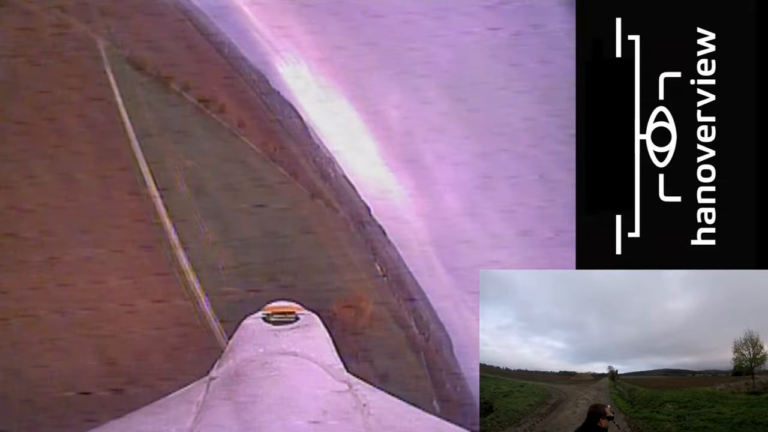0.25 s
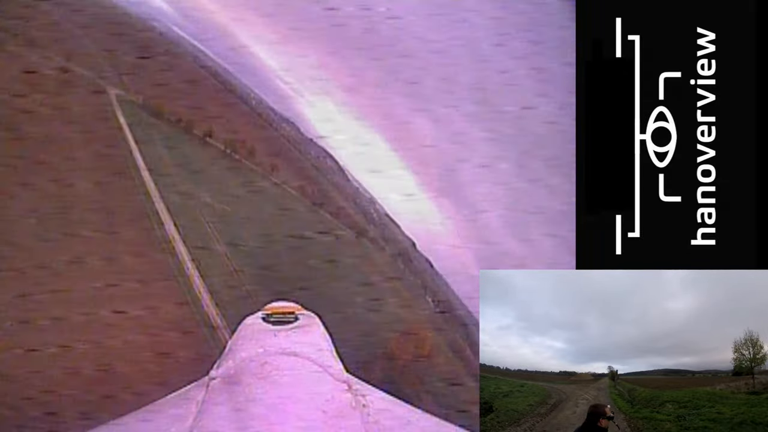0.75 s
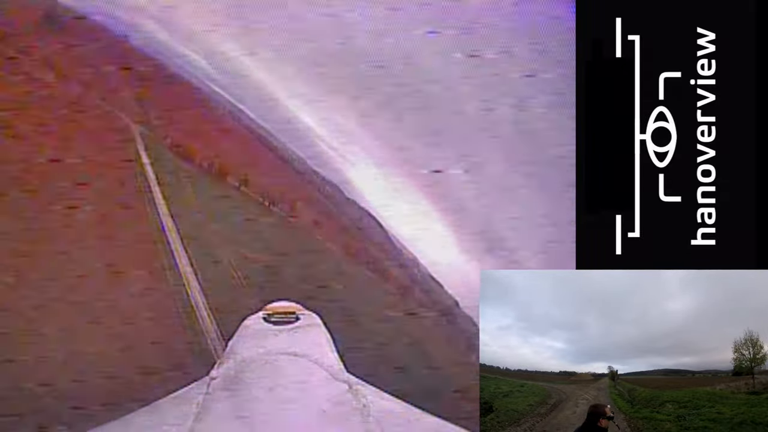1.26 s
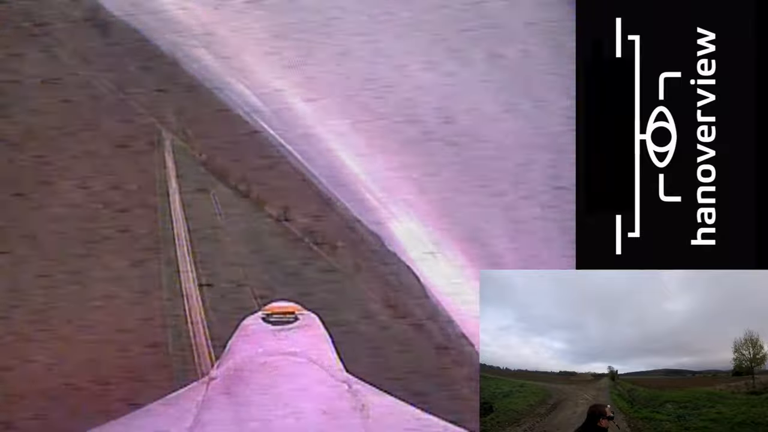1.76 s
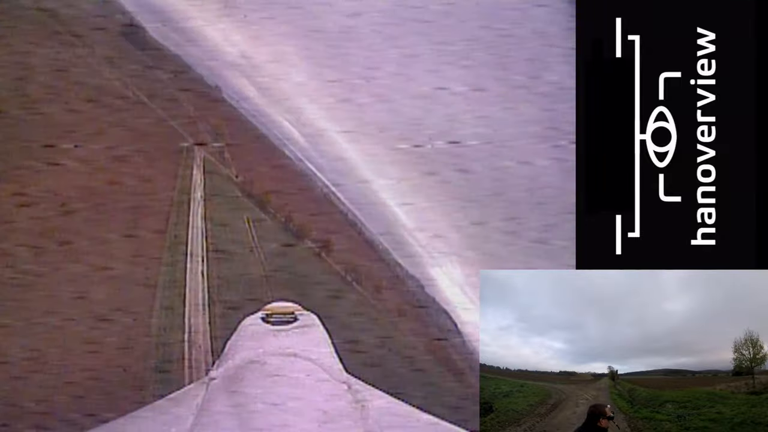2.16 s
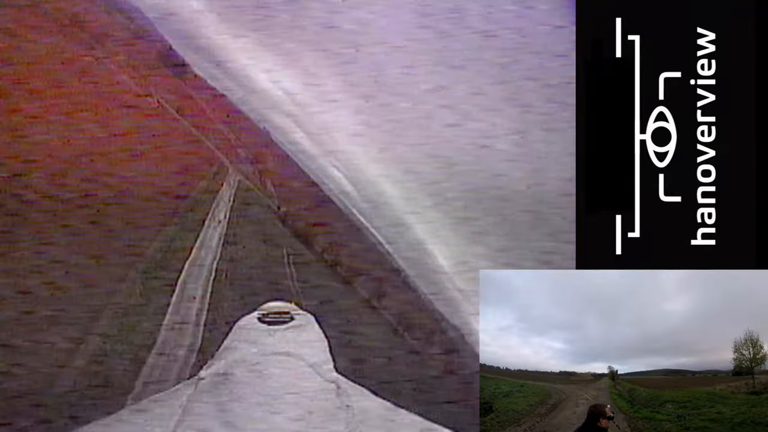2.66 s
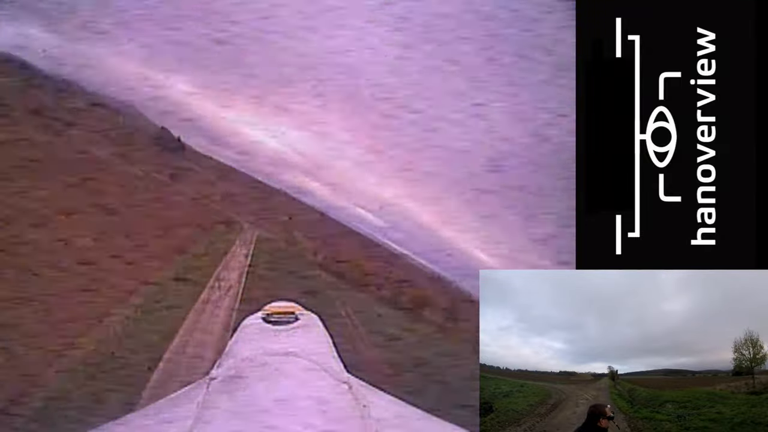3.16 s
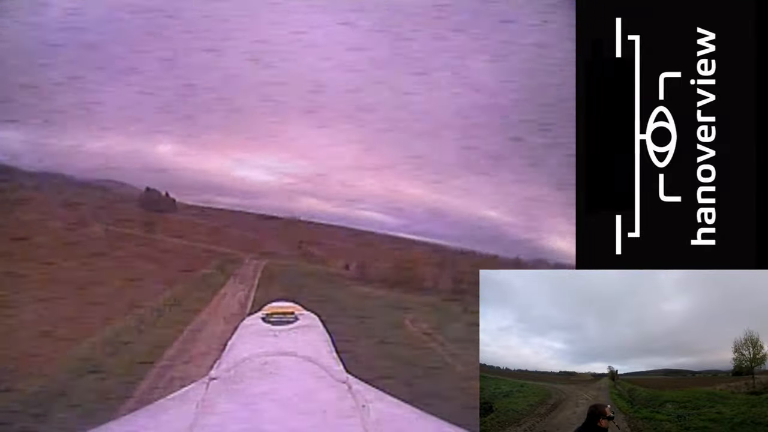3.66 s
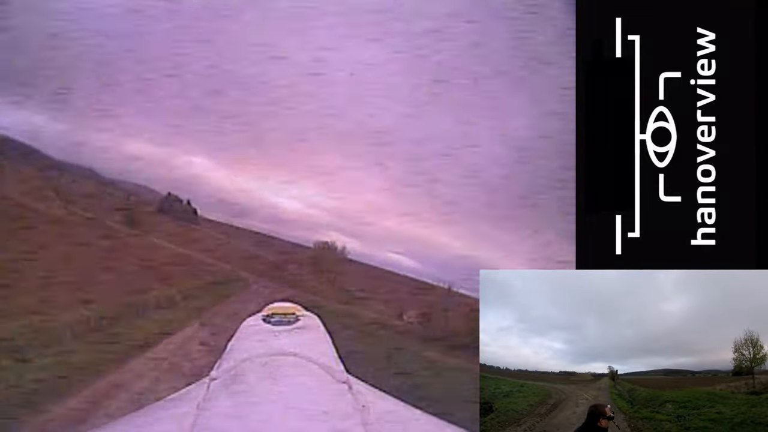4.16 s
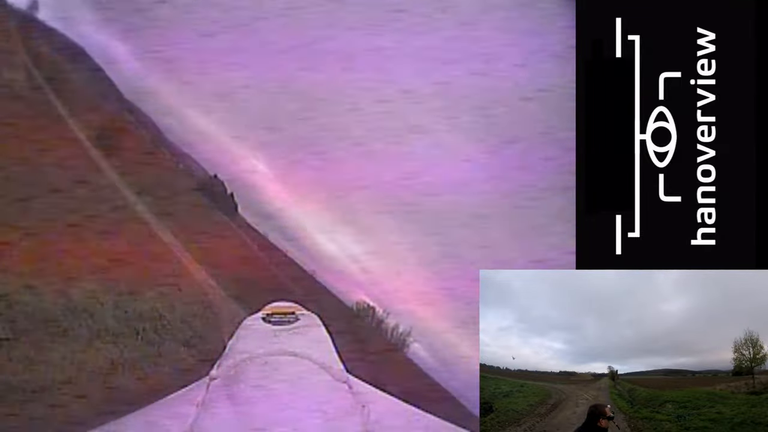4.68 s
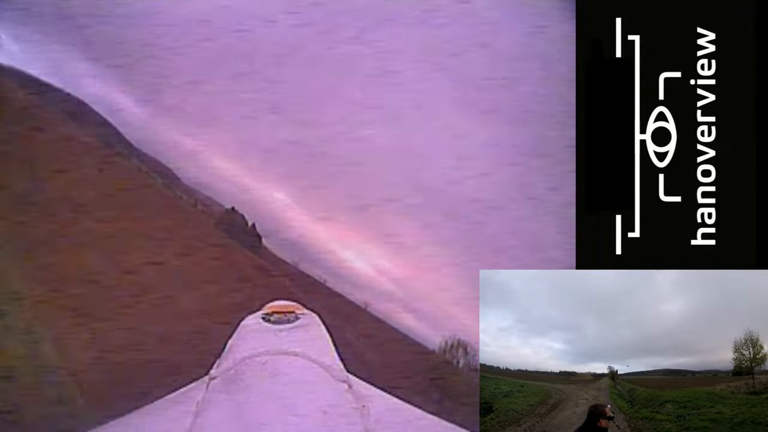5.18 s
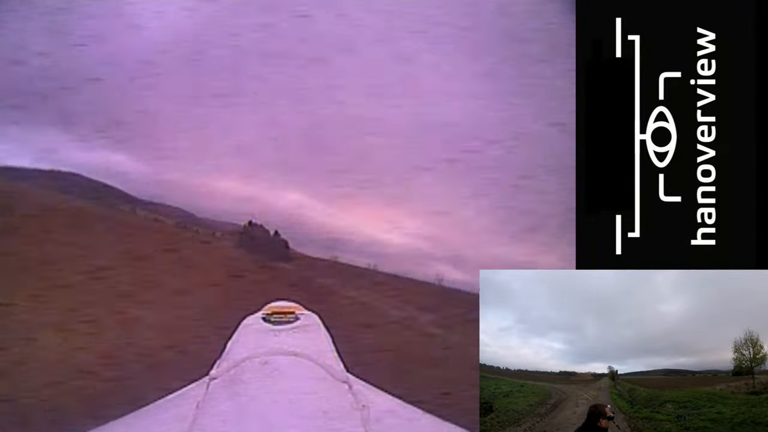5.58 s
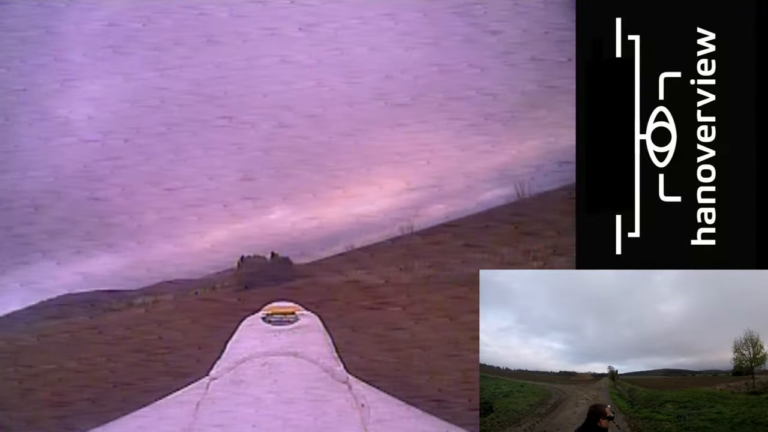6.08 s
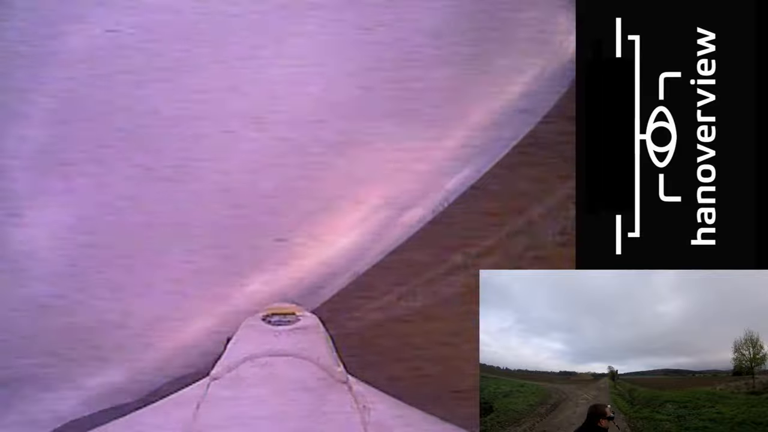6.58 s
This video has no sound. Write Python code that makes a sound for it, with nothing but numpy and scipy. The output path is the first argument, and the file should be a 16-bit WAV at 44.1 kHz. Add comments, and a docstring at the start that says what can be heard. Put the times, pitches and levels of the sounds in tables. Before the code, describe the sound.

A faint two-toned propeller whine rises under heavy wind buffeting, grows loud and hissing on a close pass, then falls in pitch as it throttles back.

```python
"""In an open field a model aircraft with two electric rotors speeds up, passes a microphone and throttles back.
Rotors: sums of sine partials at multiples of the shaft rates, which swell and fade, each on its own.
Slipstream: two bands of noise that surge and flicker. Wind: lumps of low noise and short pops on the bare capsule.
A brief throbbing rattle of narrow noise comes early; a faint steady noise of the field lies under everything."""
import sys
import numpy as np
from scipy import signal
from scipy.fft import rfft, irfft, next_fast_len
from scipy.io import wavfile

SR = 44100
rng = np.random.default_rng(int(sys.argv[2]) if len(sys.argv) > 2 else 0)


def dump(signal):
    """Clip the signal to [-1, 1] and save it as 16-bit WAV at the path in sys.argv[1]."""
    limited = np.clip(np.atleast_2d(signal).T, -1, 1)
    pcm = np.round(limited * 32767).astype(np.int16)
    wavfile.write(sys.argv[1], SR, pcm)


N = 301203  # samples

# Levels of the sounds hold ahead of the microphone; its own hiss is added after the roll-off.
# A decay is the time from a peak to 1/e of it.
# Rotors. Blade tones as heard: [t/s, faster rotor f/Hz, slower rotor f/Hz]
BLADE_TONES = [(0.0, 600, 560), (0.125, 652, 622), (0.25, 765, 690), (0.375, 862, 755), (0.5, 912, 815),
               (0.625, 960, 858), (0.75, 990, 887), (0.875, 1039, 936), (1.0, 1074, 958),
               (1.25, 1139, 1025), (1.5, 1198, 1072), (1.75, 1243.5, 1111), (2.0, 1342, 1178.5),
               (2.125, 1389.5, 1202.5), (2.25, 1431, 1223), (2.375, 1457, 1244), (2.625, 1500, 1285),
               (2.875, 1565.5, 1332), (3.0, 1605, 1360.5), (3.125, 1659, 1408), (3.25, 1680, 1440),
               (3.375, 1694.5, 1448), (3.5, 1735.5, 1475), (3.625, 1800.5, 1515), (3.75, 1836.5, 1529.5),
               (3.875, 1828, 1527), (4.06, 1829, 1534), (4.375, 1788.5, 1520), (4.625, 1742, 1493),
               (4.75, 1698.5, 1457.5), (5.0, 1581, 1369), (5.25, 1480.5, 1290), (5.375, 1450, 1263),
               (5.5, 1430, 1247.5), (5.625, 1413.5, 1239), (5.875, 1390, 1212), (6.125, 1375, 1204),
               (6.25, 1331, 1178), (6.375, 1278, 1137), (6.625, 1101, 1005), (6.75, 1034, 946),
               (6.83, 1009, 925.5)]
# Mean level of the blade tones: [t/s, faster rotor level/dB, slower rotor level/dB]
BLADE_LEVELS = [(0.0, -67, -72), (.25, -54.5, -61), (.375, -49.5, -67), (.5, -51.5, -56), (.7, -48.5, -76),
                (.875, -53, -56), (1.0, -51, -57.5), (1.15, -65, -62), (1.35, -72, -61), (1.5, -54, -57),
                (1.65, -70, -56), (1.87, -58, -62), (1.999, -69, -54.5), (2.13, -51.5, -53),
                (2.27, -48, -49), (2.5, -51.5, -48.5), (2.75, -43.5, -46.5), (2.88, -46, -52),
                (3.12, -39.5, -52.5), (3.4, -42.5, -51.5), (3.63, -37.5, -46), (3.75, -41.5, -52),
                (3.88, -35, -53), (4.0, -28.5, -52.5), (4.25, -39.5, -50), (4.38, -33, -40.5),
                (4.5, -36, -35.5), (4.63, -49, -40), (4.75, -30.5, -45), (5.0, -31, -44.5),
                (5.13, -34, -31.5), (5.3, -42, -33.5), (5.5, -35.5, -38), (5.63, -47, -36),
                (5.77, -38, -33.5), (5.88, -36, -42.5), (6.0, -42, -41.5), (6.1, -39, -46),
                (6.25, -51, -58), (6.37, -50, -52), (6.5, -49, -47.5), (6.83, -55, -49.5)]
# Reference level of the overtones before surges: [t/s, faster rotor level/dB, slower rotor level/dB]
OVERTONE_LEVELS = [(0.0, -73, -77), (.3, -65.5, -66), (0.701, -67, -70), (1.1, -68, -71),
                   (1.5, -63.5, -63.5), (1.8, -69, -61.5), (2.3, -61.5, -58), (2.65, -56.5, -53.5),
                   (2.9, -63.5, -60), (3.2, -52, -59.5), (3.6, -59.5, -52), (3.95, -55, -51),
                   (4.25, -47.5, -49), (4.55, -50.5, -44.5), (4.9, -36.5, -45), (5.2, -44.5, -41.5),
                   (5.5, -41, -39.5), (5.9, -44, -41.5), (6.3, -45.5, -48.5), (6.83, -54, -49.5)]
# Overtones, rotor and shaft order: [level/dB relative to the reference at its loudest, dB lost per dB it falls]
OVERTONES = {"fast 6": (-3, 0.88), "fast 9": (-1.8, 1.11), "fast 12": (-1, 1.24), "fast 15": (-4, 1.42),
             "fast 18": (-11.5, 1.4), "fast 21": (-15, 1.6), "fast 24": (-19, 1.3), "slow 6": (-1.5, 0.97),
             "slow 9": (-3, 1.07), "slow 12": (-6.5, 1.21), "slow 15": (-8, 1.32), "slow 18": (-11.5, 1.35),
             "slow 21": (-12.5, 1.6), "slow 24": (-16.5, 1.3)}
# Motor whine, same key and columns: [relative level/dB, dB lost per dB]
WHINE = {"fast 4": (-24.5, 0.57), "fast 7": (-18.5, 0.73), "fast 14": (-15.5, 1.8), "slow 7": (-12.5, 0.75),
         "slow 14": (-19, 0.78)}
# Momentary added swells of a partial: [t/s, rotor and order, level/dB, decay/s]
SWELLS = [(.25, "fast 6", -68, 0.078), (.5, "slow 6", -64, 0.074), (.75, "fast 6", -63, .08),
          (.75, "slow 9", -75, 0.081), (1.55, "slow 14", -71, .12), (2.1, "fast 4", -64.5, .25),
          (2.12, "fast 21", -58, 0.12), (3.2, "fast 4", -65, 0.52), (3.4, "slow 9", -60.5, 0.062),
          (4.25, "slow 21", -52, .2), (4.62, "slow 21", -45, 0.07), (4.5, "fast 21", -46, .15),
          (4.9, "slow 18", -54, 0.16), (4.88, "fast 15", -61, 0.094), (5.38, "fast 15", -53, .08),
          (5.38, "slow 15", -50, 0.053), (5.75, "slow 15", -58, 0.053), (0.845, "slow 7", -63, 0.14),
          (1.5, "slow 7", -67, 0.36), (1.45, "fast 9", -73, 0.085), (2.295, "slow 6", -59, 0.071),
          (2.496, "slow 12", -62, 0.38), (3.193, "fast 6", -64, 0.3), (3.118, "fast 12", -56, 0.069),
          (3.25, "fast 18", -51, 0.13), (3.3, "slow 21", -46, .1), (2.65, "slow 6", -64, 0.12),
          (2.65, "fast 9", -65, 0.18), (3.247, "fast 9", -62.5, 0.3), (3.63, "fast 9", -59, 0.063),
          (3.65, "slow 6", -59, .1), (3.967, "fast 9", -55.5, 0.24), (3.96, "fast 6", -56, 0.12),
          (4.19, "slow 6", -52, .15), (4.297, "fast 18", -44, .12), (4.597, "fast 18", -43, 0.1),
          (4.622, "fast 6", -40.5, 0.13), (4.56, "slow 6", -50, 0.12), (4.46, "fast 9", -44.5, 0.059),
          (4.8, "fast 9", -43, 0.04), (4.88, "fast 12", -48.5, 0.22), (4.9, "slow 14", -41.5, 0.17),
          (5.075, "fast 14", -49, 0.2), (5.0, "slow 21", -36, 0.11), (5.178, "fast 21", -24, 0.11),
          (5.282, "fast 6", -33.5, 0.15), (5.22, "slow 6", -46, 0.19), (5.388, "slow 12", -43.5, 0.046),
          (5.33, "fast 4", -51, 0.13), (5.51, "slow 6", -47, 0.063), (5.527, "slow 9", -51, 0.091),
          (5.524, "slow 7", -43.5, 0.071), (5.71, "fast 15", -45.5, 0.15), (5.753, "fast 21", -32, 0.23),
          (5.74, "slow 6", -60, 0.099), (6.09, "slow 6", -54, 0.097), (6.242, "slow 9", -48, 0.082),
          (6.276, "fast 12", -58, 0.043), (6.26, "fast 6", -45.5, 0.03), (6.536, "slow 9", -50, 0.11),
          (6.507, "slow 6", -51, .08)]
# Momentary sinking of a partial: [t/s, rotor and order, depth/dB, decay/s]
DROPOUTS = [(.7, "slow 6", 14, .2), (1.15, "fast 12", 12, .15), (1.15, "fast 9", 14, 0.09),
            (1.8, "fast 12", 16, .12), (1.8, "fast 15", 12, .15), (2.0, "slow 15", 16, 0.26),
            (2.2, "fast 6", 8, 0.36), (2.25, "slow 7", 8, .25), (2.882, "fast 12", 20, 0.1),
            (2.88, "slow 9", 14, .1), (2.88, "slow 12", 18, .08), (3.2, "slow 9", 10, .15),
            (3.65, "fast 15", 20, 0.17), (3.75, "slow 7", 12, .25), (4.152, "fast 6", 10, 0.14),
            (4.15, "fast 12", 6, 0.37), (4.8, "slow 6", 6, 0.092), (4.882, "slow 9", 15, .08),
            (5.158, "fast 9", 12, 0.22), (5.42, "fast 21", 14, .1), (5.45, "fast 18", 18, .12),
            (5.55, "fast 6", 12, .08), (5.57, "slow 15", 18, .1), (5.78, "fast 6", 12, 0.1),
            (5.9, "slow 15", 12, .06)]
# Faint tones at the closest approach: [t/s, fast shaft reference level/dB, tone under slow rotor level/dB]
CLOSE_TONES = [(3.4, -75, -80), (3.8, -65, -86), (4.25, -55.5, -82), (4.4, -53, -56), (4.75, -46, -50),
               (5.0, -43.5, -44), (5.2, -51, -47.5), (5.4, -66, -50.5), (5.6, -67, -66)]
# Shaft tones of the fast rotor: [multiple of the shaft rate, level/dB relative to the reference]
SHAFT_ORDERS = [(1, -2.5), (2, -10), (5, -15.5)]
BLADES = 3
UNDERTONE_RATIO = .872  # to the slow blade tone
FADE_DB, FADE_HZ = 4.5, 3.4  # rms depth and corner rate of each partial's own random fading
SURGE_SHARE = 0.59  # how far the partials follow the surges of the hiss body

# Slipstream hiss between its surges: [t/s, body level/dB, treble level/dB]
SLIPSTREAM = [(0.0, -82, -82), (.3, -73, -79), (.8, -70, -77), (1.15, -77, -81), (1.7, -65, -75),
              (2.15, -63, -71), (2.4, -56, -66), (3.0, -56, -66), (3.3, -54, -59), (3.85, -54, -64),
              (4.17, -54, -58), (4.45, -43.5, -47), (4.8, -39.5, -43), (5.25, -40.5, -40), (5.6, -42, -42),
              (5.85, -46, -51), (6.2, -49, -50), (6.45, -53, -56), (6.83, -54, -61)]
# Surges of the hiss: [t/s, body lift/dB, treble lift/dB, decay/s]
SURGES = [(.4, 2, 6, .06), (.67, 1, 5, 0.046), (.96, 9, 9, 0.12), (1.43, 10.5, 13, 0.084),
          (1.58, 7, 9, .05), (1.85, 1, 1.5, 0.066), (2.08, 5, -5, 0.046), (2.25, 2, 0, .04),
          (2.67, 2, 9.5, 0.069), (3.15, 2, 7.5, 0.088), (3.42, -0.5, 6.5, 0.055), (3.67, 4, 3, .06),
          (3.93, 8, 6, 0.062), (4.08, 0.5, 5, 0.047), (5.12, 1, 2, 0.11), (5.33, 1.5, 7.5, 0.052),
          (5.53, 3, 7.5, 0.033), (5.75, 7.5, 14, 0.016), (6.33, 1.5, 6, .04), (6.53, 4, 9.5, 0.077),
          (6.76, 4, 9, 0.048)]
# Relative noise density of the two hiss bands: [f/Hz, level/dB per Hz]
BODY_SPECTRUM = [(500, -2), (900, -11.5), (1500, -1.5), (2100, -6), (2800, -6.5), (3600, -8), (4600, -11),
                 (6000, -17.5)]
TREBLE_SPECTRUM = [(3000, -27), (4200, -12), (5200, 1), (6100, -10.5), (6500, 4.5), (6900, -4.5),
                   (7600, -2.5), (8500, -6.5), (9500, -6.5)]

# Wind on the capsule between its lumps: [t/s, rumble level/dB, flutter level/dB]
WIND = [(0.0, -19, -37), (.45, -29.5, -41.5), (.6, -20.5, -34), (.9, -26.5, -36.5), (1.07, -18.5, -31),
        (1.27, -24, -37), (1.45, -27.5, -37.5), (1.68, -18, -31), (2.0, -23, -32.5), (2.2, -18, -32.5),
        (2.6, -24, -33.5), (2.72, -13.5, -32), (3.05, -31, -39.5), (3.3, -19.5, -31.5),
        (3.45, -13.5, -38.5), (3.52, -23.5, -33), (3.9, -23.5, -32.5), (4.3, -23, -35), (4.6, -24, -36),
        (4.9, -25, -35), (5.15, -26, -35), (5.45, -27.5, -36), (5.63, -13, -29), (5.82, -11.5, -28),
        (5.93, -28.5, -34.5), (6.2, -25, -37), (6.45, -26.5, -39.5), (6.83, -23.5, -36.5)]
# Lumps (+) and lulls (-) of the wind: [t/s, rumble change/dB, flutter change/dB, decay/s]
LUMPS = [(.03, -2, 1, 0.022), (.08, -6.5, -2, 0.032), (.27, 6.5, 0, 0.015), (.33, -11, 2.5, 0.027),
         (.52, 9, 4, 0.013), (.63, 3.5, 6, 0.019), (.71, -6, -3.5, 0.045), (.81, 2, 3.5, 0.034),
         (.88, -10, 5.5, 0.018), (1.18, 7.5, -19, 0.012), (1.71, 11, -6, 0.014), (1.89, 6.5, 9.5, 0.02),
         (2.28, -6.5, -3.2, 0.058), (2.42, 0, -10, 0.049), (2.47, 2, 3.5, 0.022), (2.83, 10.5, -7, 0.022),
         (2.87, -22, -1.5, 0.018), (2.91, 1.5, 2, 0.012), (3.14, 7.5, -5, 0.045), (3.26, -7.5, -9.5, 0.026),
         (3.76, 6, -4, .03), (3.95, 17, 8, 0.011), (4.11, 7.5, 0.1, 0.042), (4.23, -5.5, -11, 0.079),
         (4.35, 0, -2, 0.033), (4.43, 3.5, 6.5, 0.035), (4.56, -5.5, -8, 0.022), (4.72, 3.5, -21, 0.058),
         (5.02, -1, -10, .03), (5.07, 5, 3, 0.018), (5.21, 4, 4.5, .05), (5.31, -11, -14, 0.044),
         (5.69, -0.5, 15.5, 0.034), (5.75, -5, -21, 0.038), (5.96, 10.5, 2, 0.024), (6.01, -1, -14, .02),
         (6.07, 9.5, 6.5, 0.041), (6.19, 10.5, 13.5, 0.022), (6.33, -6, -8, 0.015), (6.39, 7, -4, 0.026),
         (6.53, 3, 9, 0.043), (6.7, 3, -3, .02), (6.82, 3.5, 3.5, 0.016)]
# Relative noise density of rumble and flutter: [f/Hz, level/dB per Hz]
RUMBLE_SPECTRUM = [(10, -23.5), (20, 3.5), (35, 2), (64, 5), (110, 1.5), (160, -5), (230, -20),
                   (350, -25.5)]
FLUTTER_SPECTRUM = [(120, -7), (200, 2.5), (300, -7.5), (450, -15.5), (650, -25), (1000, -37),
                    (1600, -51.5)]
# Sharp buffets: [centre t/s, peak level/dB less 1 dB, decay/s (capped at 0.02), share of bright noise 0-1]
POPS = [(0.644, -21.5, 0.011, 0.01), (1.034, -28, 0.007, 0.05), (1.107, -35, 0.0072, 0),
        (1.18, -26.5, 0.0058, 0), (1.712, -28.5, 0.013, 0.38), (2.101, -26.5, 0.012, 0.1),
        (2.172, -21.5, 0.0067, 0), (2.724, -21.5, 0.0055, 0.1), (2.782, -27, 0.016, 0.18),
        (2.825, -15.5, 0.0046, 0.66), (2.906, -37, 0.0074, 0.06), (3.178, -31, 0.0043, .3),
        (3.363, -19, 0.0052, 0), (3.392, -17, 0.006, 0), (3.405, -20, 0.011, 0.23),
        (3.426, -20, .005, 0.15), (3.455, -14.5, 0.013, 0.23), (3.95, -22, 0.0077, 0.05),
        (4.411, -22.5, 0.013, 0.17), (5.62, -10.5, 0.0074, 0.26), (5.662, -18.5, 0.0092, 0.02),
        (5.69, -11.5, 0.015, 0.22), (5.738, -18.5, 0.018, 0.3), (5.767, -9, 0.0041, 0.13),
        (5.818, -12.5, 0.0097, 0.26), (5.851, -24, 0.018, 0.5), (5.937, -26, 0.005, 0.23),
        (5.972, -28, .012, 0), (6.07, -20, 0.014, 0.1), (6.124, -17.5, 0.0056, 0.6),
        (6.201, -22.5, 0.019, 0.23), (6.234, -23.5, 0.0094, 0.2), (6.417, -14.5, 0.0069, 0.21),
        (6.52, -24.5, 0.023, 0.17), (6.589, -22.5, 0.013, 0.23), (6.749, -23, 0.0072, 0)]

# Relative noise density of the field: [f/Hz, level/dB per Hz]
FIELD_SPECTRUM = [(600, 5), (1000, -2), (2100, -10), (3300, -16), (4300, -29), (5200, -28.5), (7200, -22.5),
                  (9000, -17)]
FIELD_DB = -57
# Brief rough rattle, envelope before its throb: [t/s, level/dB]
RATTLE = [(.42, -80), (.435, -58), (.49, -56), (.53, -60), (.545, -80)]
# Relative noise density of the rattle: [f/Hz, level/dB per Hz]
RATTLE_SPECTRUM = [(1500, -12.5), (1850, 1.5), (2000, 1), (2150, -2), (2700, -19), (3900, -8), (4200, -25)]

PORT_HZ, PORT_Q, PORT_DB = 6530, 2.98, 11.5  # resonance of the sound port
ROLL_OFF_HZ, ROLL_OFF_DB = 9700, 36  # stopband edge and attenuation
CUTOFF_HZ = 14500  # stopband edge of the final low-pass
SELF_NOISE_DB, SELF_NOISE_HZ = -75, (8360, 13200)
TOP = 1.1  # ceiling of the rounded peaks, full scale = 1
OFFSET = -.038  # constant bias, full scale = 1
RUN_IN = 2000  # samples that settle the filters


def amp(db):
    """A level in decibels is twenty times the logarithm of the gain."""
    return 10 ** (np.asarray(db) / 20)


def rms_one(x):
    """Division by the root mean square gives unit effective amplitude."""
    return x / np.sqrt(np.mean(x ** 2) + 1e-20)


def in_time(rows):
    """Linear interpolation turns each column after t/s into a curve at the sample rate."""
    s, *columns = np.transpose(rows)
    return np.array([np.interp(np.arange(N) / SR, s, c) for c in columns])


def bell(s, decay):
    """A Gaussian window of height 1 is centred on s."""
    return np.exp(-((np.arange(N) / SR - s) / decay) ** 2)


def bumps(rows):
    """Gaussian lifts in dB superpose into two curves."""
    out, t = np.zeros((2, N)), np.arange(N) / SR
    for s, first, second, decay in rows:
        near = slice(max(round((s - .3) * SR), 0), round((s + .3) * SR))
        window = np.exp(-((t[near] - s) / decay) ** 2)
        out[:, near] += np.outer([first, second], window)
    return out


def drift(rate):
    """A double one-pole low-pass, each pole at `rate` in Hz, makes slow noise of rms 1."""
    step = 40  # samples between the coarse values
    r = np.exp(-2 * np.pi * rate * step / SR)
    coarse = rng.standard_normal(N // step + 2002)
    slow = signal.lfilter([1], [1, -2 * r, r * r], coarse)[2000:]
    return np.interp(np.arange(N) / step, np.arange(len(slow)), rms_one(slow))


def coloured(spectrum):
    """White noise weighted by a spectral density, steep outside its ends, is coloured noise; rms 1."""
    size = next_fast_len(N)
    hz, db = np.transpose(spectrum)
    log_bins = np.log(np.arange(1, size // 2 + 2) * SR / size)
    log_hz = np.log([hz[0] / 2, *hz, hz[-1] * 2])
    shape = amp(np.interp(log_bins, log_hz, [db[0] - 43.5, *db, db[-1] - 44]))
    return rms_one(irfft(rfft(rng.standard_normal(size)) * shape, size)[:N])


def tone(turns, level_db, flicker_db, wobble):
    """Turbulent air modulates the level of a sine partial and its phase (wobble in rad rms)."""
    phase = 2 * np.pi * (turns + rng.random()) + wobble * drift(10.4)
    return np.sqrt(2) * amp(level_db + flicker_db * drift(27)) * np.sin(phase)


def partial_db(name, under_db, loss, levels):
    """Each partial scales with its rotor's overtone level by its own exponent, fades, sinks and swells."""
    level_db = levels[name[:4]]
    loudest_db = level_db.max()
    sunk_db = FADE_DB * np.abs(drift(FADE_HZ))
    for s, who, depth_db, decay in DROPOUTS:
        if who == name:
            sunk_db += depth_db * bell(s, decay)
    gain = amp(loudest_db + under_db + loss * (level_db - loudest_db) - sunk_db)
    for s, who, peak_db, decay in SWELLS:
        if who == name:
            gain += amp(peak_db) * bell(s, decay)
    return 20 * np.log10(gain)


def rotors(shafts, levels):
    """Passing blades radiate harmonics of the blade rate; higher ones flicker and wobble more."""
    out = np.zeros(N)
    for name, level_db in zip(shafts, in_time(BLADE_LEVELS)):
        out += tone(BLADES * shafts[name], level_db, flicker_db=1.56, wobble=0.47)
    for name, (under_db, loss) in OVERTONES.items():
        order = int(name[5:])
        level_db = partial_db(name, under_db, loss, levels)
        out += tone(order * shafts[name[:4]], level_db,
                    flicker_db=1.0 + 0.19 * order, wobble=0.1 * order)
    return out


def motors(shafts, levels):
    """Magnet forces whine at shaft orders (seven pole pairs a turn); faint shaft tones join close by."""
    out = np.zeros(N)
    for name, (under_db, loss) in WHINE.items():
        level_db = partial_db(name, under_db, loss, levels)
        out += tone(int(name[5:]) * shafts[name[:4]], level_db, flicker_db=2.5, wobble=1.0)
    shaft_db, under_db = in_time(CLOSE_TONES)
    for order, db in SHAFT_ORDERS:
        out += tone(order * shafts["fast"], shaft_db + db, flicker_db=.7, wobble=.2)
    undertone_turns = UNDERTONE_RATIO * BLADES * shafts["slow"]
    return out + tone(undertone_turns, under_db, flicker_db=.8, wobble=.3)


def slipstream(surge_db):
    """Turbulent flow radiates broadband noise; both bands flicker together, the treble more."""
    body_db, treble_db = in_time(SLIPSTREAM) + surge_db
    flicker_db = 1.6 * drift(35)
    body = amp(body_db + 0.73 * flicker_db) * coloured(BODY_SPECTRUM)
    treble = amp(treble_db + flicker_db) * coloured(TREBLE_SPECTRUM)
    return body + treble


def aircraft():
    """Integrated rotation rate gives shaft angle, the common phase of each rotor's partials."""
    names = ["fast", "slow"]
    turns = np.cumsum(in_time(BLADE_TONES), axis=1) / SR / BLADES
    shafts = dict(zip(names, turns))
    surge_db = bumps(SURGES)
    levels = dict(zip(names, in_time(OVERTONE_LEVELS) + SURGE_SHARE * surge_db[0]))
    return rotors(shafts, levels) + motors(shafts, levels) + slipstream(surge_db)


def wind():
    """Eddies on the capsule come in lumps that swell rumble and flutter together, the flutter most."""
    rumble_db, flutter_db = in_time(WIND) + bumps(LUMPS)
    lumps = drift(46)
    rumble = amp(rumble_db + 0.84 * lumps) * coloured(RUMBLE_SPECTRUM)
    flutter = amp(flutter_db + 2.77 * lumps + 0.9 * drift(5.2)) * coloured(FLUTTER_SPECTRUM)
    return rumble + flutter


def field_hiss():
    """Stationary coloured noise of constant rms level forms the background."""
    return amp(FIELD_DB) * coloured(FIELD_SPECTRUM)


def rattle():
    """A squared sine modulates narrow noise, so that it throbs 48 times a second."""
    throb = np.sin(np.pi * 48.0 * np.arange(N) / SR) ** 2
    return amp(in_time(RATTLE)[0]) * (0.36 + throb) * coloured(RATTLE_SPECTRUM)


def pops():
    """An eddy bursting on the capsule is a Gaussian puff of noise; sharp ones reach higher in frequency."""
    out = np.zeros(N)
    dull = coloured([(150, 4), (300, -3), (500, -7.5), (800, -21.5)])
    bright = coloured([(300, -0.5), (600, 1.5), (1000, -3), (1600, -17.5)])
    for s, db, decay, sharp in POPS:
        near = slice(round((s - .05) * SR), min(round((s + .05) * SR), N))
        age = (np.arange(near.start, near.stop) / SR - s) / min(decay, .02)
        puff = np.exp(-age ** 2) * (dull[near] + sharp * bright[near])
        out[near] += amp(db + 1.0) * puff / np.abs(puff).max()
    return out


def scene():
    """Sound pressures of independent sources superpose at one microphone."""
    return (aircraft() + wind() + field_hiss() + rattle() + pops())[None]


def record(dry):
    """The port resonates, the treble rolls off, peaks saturate; the circuit adds hiss and a bias."""
    w, lift = 2 * np.pi * PORT_HZ / SR, amp(PORT_DB / 2)
    width = np.sin(w) / 2 / PORT_Q
    zeros = [1 + width * lift, -2 * np.cos(w), 1 - width * lift]
    poles = [1 + width / lift, -2 * np.cos(w), 1 - width / lift]
    x = signal.lfilter(zeros, poles, np.pad(dry, ((0, 0), (RUN_IN, 0)), "reflect"))
    roll_off = signal.cheby2(10, ROLL_OFF_DB, ROLL_OFF_HZ, fs=SR, output="sos")
    x = signal.sosfilt(roll_off, x)[:, RUN_IN:]
    hiss_band = signal.butter(4, SELF_NOISE_HZ, "band", fs=SR, output="sos")
    hiss = signal.sosfilt(hiss_band, rng.standard_normal(N))
    x = TOP * np.tanh(x / TOP) + amp(SELF_NOISE_DB) * rms_one(hiss)
    cutoff = signal.cheby2(12, 60, CUTOFF_HZ, fs=SR, output="sos")
    return signal.sosfilt(cutoff, x) + OFFSET


dry = scene()
out = record(dry)
dump(out)
```